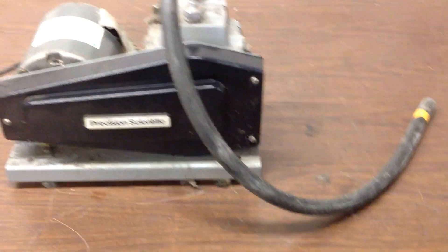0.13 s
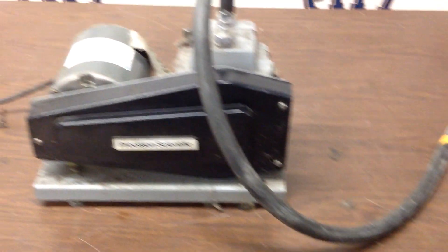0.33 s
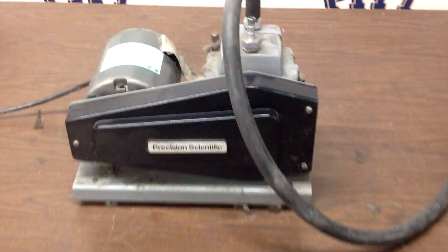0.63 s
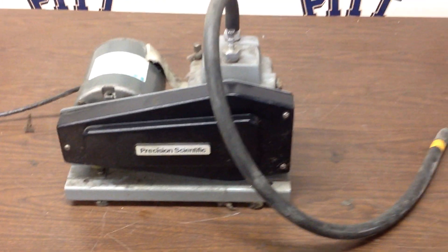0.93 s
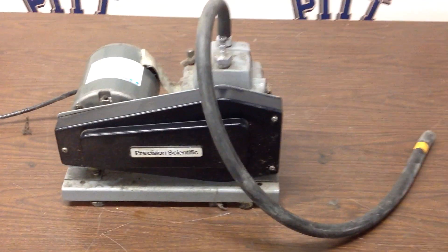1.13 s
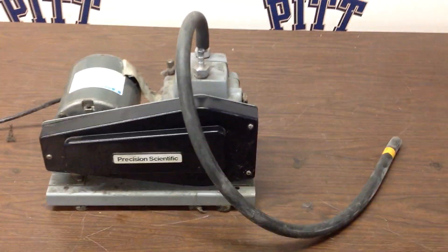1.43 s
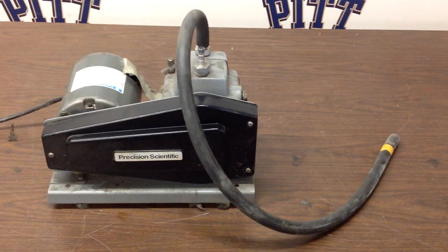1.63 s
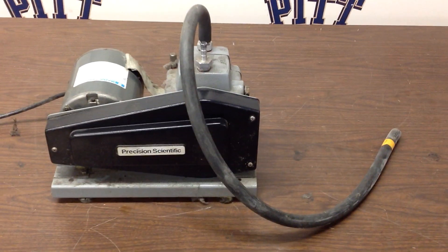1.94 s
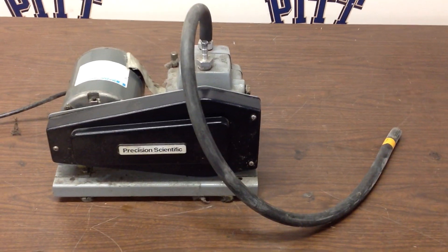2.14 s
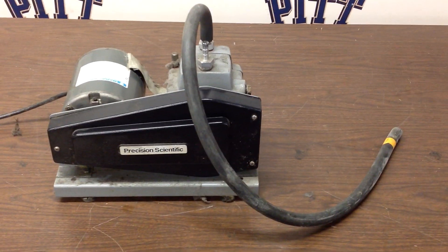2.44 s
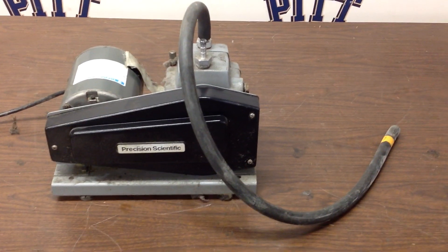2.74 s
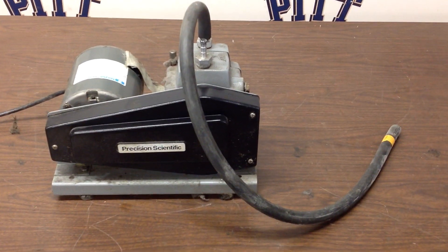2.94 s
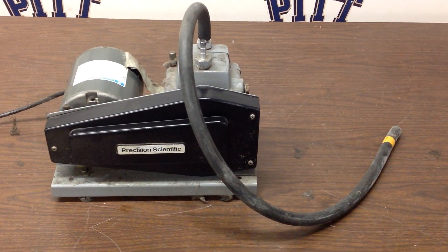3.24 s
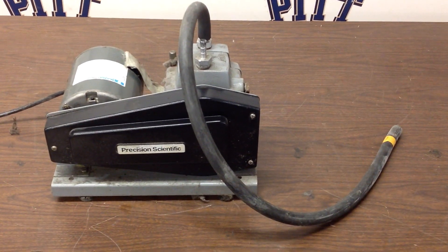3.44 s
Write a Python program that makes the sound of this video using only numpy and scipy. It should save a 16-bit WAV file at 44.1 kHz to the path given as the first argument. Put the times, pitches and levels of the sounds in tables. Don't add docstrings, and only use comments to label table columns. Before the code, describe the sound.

A vacuum pump already runs after a sliver of silence, its crisp metallic strokes rattling about twenty per second. Until 0.5 s it is very close and loud, with finger bumps and rustle around 0.1-0.2 s and harsh strokes near 0.36 s. It then settles lower and steady to 3.6 s: belt knocks every 0.3 s, lighter flaps, low hum, table vibration, pulsing airy hiss; handling tick near 0.92 s.

```python
import sys
import numpy as np
from scipy import signal
from scipy.fft import rfft, irfft, next_fast_len
from scipy.io import wavfile
from scipy.ndimage import uniform_filter1d

SR = 44100
rng = np.random.default_rng(int(sys.argv[2]) if len(sys.argv) > 2 else 0)


def amplitude_ratio(level_db):
    exponent = np.asarray(level_db, float) / 20
    return 10 ** exponent


def digitize_waveform(pressure):
    field = np.atleast_2d(pressure).T
    bounded = np.clip(field, -1, 1)
    quanta = np.round(bounded * 32767).astype(np.int16)
    wavfile.write(sys.argv[1], SR, quanta)


N = 157878
TIME_S = np.arange(N) / SR
STROKE_S, FIRST_STROKE_S, STROKE_DB = .048946, .0688, -19

# time_s, near_db
NEARNESS = [
    (0, 10.5),
    (.5, -1.5),
    (.75, 1.5),
    (1.0, 1.4),
    (2.0, 1.5),
    (3.58, 0.4),
]
# start_s, level_db
VANE_STROKES = [(0.1662, -13), (0.3619, -7), (0.462, -9.5), (0.5594, -10.5), (0.66, -13.5), (0.7566, -12),
                (0.8533, -16.5), (0.901, -16.5), (1.0482, -16), (1.147, -17.5), (1.195, -16),
                (1.342, -15.5), (1.39, -16), (1.6843, -16.5), (1.9786, -16.5), (2.0772, -16.5),
                (2.224, -14.5), (2.321, -14.5), (2.37, -14), (2.7118, -15.5), (2.761, -17), (2.8106, -16),
                (2.8594, -13.5), (2.9572, -18.5), (3.0546, -16.5), (3.103, -17), (3.299, -16.5),
                (3.398, -16), (3.4952, -16), (3.543, -16.5),
                (0.1181, -16), (0.214, -15), (0.2634, -15), (0.312, -15.5), (0.411, -15), (0.508, -17),
                 (0.607, -20), (0.7026, -23), (0.9484, -19.5), (1.292, -21), (1.4895, -17), (1.7325, -21.5),
                 (2.272, -21), (2.419, -13.5), (2.4668, -19.5), (2.517, -18.5), (2.663, -18.5),
                 (2.9068, -19), (3.005, -19), (3.2, -20)]
# pitch_hz, level_db, t60_s
HOUSING_MODES = [(2010, -20.5, 0.016), (2820, -21, 0.031), (4930, -35, 0.073), (5170, -21, 0.095),
                 (6240, -12.5, 0.06), (7470, -16, 0.022), (8450, -11, 0.0078), (8760, -10.5, 0.03),
                 (8556, -12.5, .03), (10160, -11, 0.089), (10910, -15.5, 0.039), (11230, -28, .03),
                 (14400, -22, 0.012)]
# frequency_hz, level_db
CRACK_COLOUR = [(1500, -13.5), (3500, -13), (5500, -7), (7000, -5.5), (9500, -2), (12000, -8.5),
                (15500, -15)]
# pitch_hz, level_db, t60_s
OIL_BOX_MODES = [(2217, -21, .1), (2090, -27, .025), (1075, -33, .05)]
# start_s, level_db
JOINT_KNOCKS = [(0.359, -23.5), (0.65, -22), (0.744, -32), (0.944, -21), (1.236, -22), (1.527, -23.5),
                (1.819, -22), (2.111, -23.5), (2.401, -21.5), (2.692, -26), (2.983, -26.5), (3.277, -26.5),
                (3.419, -27)]
# start_s, level_db
BELT_FLAPS = [(0.288, -46), (0.868, -30.5), (1.161, -47), (1.453, -30), (1.745, -30.5), (2.038, -33),
              (2.329, -28.5), (2.601, -30.5), (2.619, -38), (2.89, -30.5), (2.913, -29.5), (3.185, -28),
              (3.199, -35), (3.477, -28), (3.494, -34.5)]
# pitch_hz, level_db, t60_s
GUARD_MODES = [(252, -10, 0.092), (337.6, 0, 0.086), (433, 2, 0.12), (527, -14, 0.013), (637, -27, 0.033),
               (747, -3, 0.075), (925, -20, 0.014), (1190, -7, 0.025), (1290, -15, 0.053),
               (2110, -12.5, 0.024)]
# delay_s, level_db
GUARD_RATTLE = [
    (0, 1),
    (.0032, -12),
    (.0072, -10),
    (.016, -14),
]
# time_s, pitch_hz, level_db
MOTOR_HUM = [(.1, 120, -41), (.55, 119.5, -40), (.8, 119.8, -46), (1.2, 120, -47), (1.5, 120, -51.5),
             (2.4, 120, -49.5), (3.58, 120, -50)]
# pitch_hz, level_db, t60_s
TABLE_MODES = [(94, -13, 0.38), (155.2, -3.5, 0.21), (212.4, 2, 0.17), (271, 2.5, 0.22), (330.8, 0.5, 0.17),
               (367.4, -3, 0.21), (440, -3.5, 0.096), (596, -25, .05), (750.6, -12, 0.19),
               (1020, -8, 0.033)]
# centre_hz, width_hz, level_db
CASING_BANDS = [(497.5, 78, -48), (1077, 81, -46)]
# time_s, level_db
CASING_FADE = [(.2, -3), (.45, 0), (.7, -2), (1.3, -6), (1.6, -14)]
# centre_hz, width_hz, level_db
VALVE_BANDS = [(4790, 140, 5.5), (5370, 156, 9.5), (6070, 820, -1)]
# time_s, flow_db
VALVE_FLOW = [(0, 8), (.2, 5.5), (.4, 9.5), (.55, 7.5), (.8, -0.5), (1.5, -2), (3.58, -3.5)]
# frequency_hz, density_db_per_hz
AIR_COLOUR = [(18, -62), (30, -53), (106, -7), (221, -4.5), (1500, -18), (3870, -18.5), (8740, -15),
              (14800, -52), (16000, -44)]
# start_s, level_db, pitch_hz, length_cycles
FINGER_BUMPS = [(0.089, -16, 880, 0.53), (0.1, -18, 1220, 0.51), (0.1132, -15, 560, 1.2),
                (0.0976, -17.5, 1500, 0.82), (0.1028, -21, 1600, 1.9), (0.1259, -11, 1510, 0.94),
                (0.1267, -13, 1730, 0.81), (0.1271, -10, 1090, 0.79), (0.1305, -16.5, 322, 1.5),
                (.154, -7, 1260, 0.76), (0.1566, -20, 294, 2.4), (0.1643, -21, 261, 1.4),
                (0.1757, -23, 1500, 2), (0.18, -25.5, 1620, 3.5), (0.306, -21, 1020, 1.5),
                (0.7455, -26, 600, 1), (0.747, -20.5, 285, 2.2), (0.9238, -13.5, 730, 1.12),
                (0.929, -28, 646, 1.5)]


def level(x, db):
    return x * amplitude_ratio(db) / np.sqrt(np.mean(x ** 2))


def curve(rows, axis=1):
    rows = np.array(rows)
    return np.interp(TIME_S, rows[:, 0], rows[:, axis])


def noise():
    return rng.standard_normal(N)


def colour(x, points):
    p, n = np.array(points), next_fast_len(N)
    hz = np.maximum(np.arange(n // 2 + 1) * SR / n, 1)
    gain_db = np.interp(np.log(hz), np.log(p[:, 0]), p[:, 1])
    return irfft(rfft(x, n) * amplitude_ratio(gain_db), n)[:N]


def ring(x, hz, t60_s):
    r = np.exp(-np.log(1000) / (max(t60_s, .002) * SR))
    w = 2 * np.pi * hz / SR
    return signal.lfilter([np.sin(w)], [1, -2 * r * np.cos(w), r * r], x)


def walk(rate_hz):
    k = int(SR / rate_hz)
    held = np.repeat(rng.standard_normal(N // k + 1), k)
    smooth = uniform_filter1d(uniform_filter1d(held, k), k)[:N]
    return smooth / smooth.std()


def strikes(times, db, fade_s, rise_s=1e-4):
    x = np.zeros(N + SR)
    x[(np.asarray(times) * SR).astype(int)] = amplitude_ratio(db)
    fading = signal.lfilter([1], [1, -np.exp(-1 / (fade_s * SR))], x)
    r = np.exp(-1 / (rise_s * SR))
    return signal.lfilter([1 - r], [1, -r], fading)[:N]


def struck(times, db, modes, fade_s, scatter_db):
    out, chance = 0, rng.standard_normal((len(times), len(modes)))
    for k, (hz, mode_db, t60_s) in enumerate(modes):
        push = strikes(times, db + mode_db + scatter_db * chance[:, k], fade_s) * noise()
        out = out + ring(push, hz, t60_s) / np.sqrt(fade_s * SR / 2)
    return out


def stroke_swing(peak_at):
    phase = (TIME_S - FIRST_STROKE_S) / STROKE_S
    return np.cos(2 * np.pi * (phase - peak_at))


def vanes():
    times = np.arange(FIRST_STROKE_S, N / SR, STROKE_S)
    chance = rng.standard_normal((len(times), 3))
    db = STROKE_DB + 1.5 * chance[:, 0] + np.interp(times, *np.array(NEARNESS).T)
    special = np.array(VANE_STROKES)
    k = np.round((special[:, 0] - FIRST_STROKE_S) / STROKE_S).astype(int)
    times[k], db[k] = special[:, 0], special[:, 1]
    box = oil_box(times, STROKE_DB + .65 * (db - STROKE_DB))
    times = np.r_[times, times + .005 * np.exp(.15 * chance[:, 1])]
    db = np.r_[db, db - 8 + 1.5 * chance[:, 2]]
    modes = [(hz, g_db, t60_s if hz < 2500 else min(t60_s, .016)) for hz, g_db, t60_s in HOUSING_MODES]
    housing = struck(times, db, modes, fade_s=.0025, scatter_db=1.8)
    crack = level(colour(noise(), CRACK_COLOUR), -9) * strikes(times, db, fade_s=.0045, rise_s=.0004)
    chatter_db = .22 * 8.5 * walk(500)
    return box + (housing + crack) * amplitude_ratio(chatter_db)


def oil_box(times, db):
    swell_s, detune, scatter_db = .005, .006, 1.5
    out = np.zeros(N + SR)
    u = np.arange(SR // 10) / SR
    swell = 1 - np.exp(-(u / swell_s) ** 2)
    for start_s, stroke_db in zip(times, db):
        i = int(start_s * SR)
        for hz, mode_db, t60_s in OIL_BOX_MODES:
            a, b = rng.standard_normal(2)
            shape = swell * amplitude_ratio(stroke_db + mode_db + scatter_db * a - 60 * u / t60_s)
            out[i:i + len(u)] += shape * np.sin(2 * np.pi * hz * (1 + detune * b) * u + 10 * a)
    return out[:N]


def belt():
    return guard(JOINT_KNOCKS, gain_db=-5.5, tilt_db_oct=0) + guard(BELT_FLAPS, gain_db=-2.5, tilt_db_oct=7.5)


def guard(blows, gain_db, tilt_db_oct):
    t, db = np.array(blows).T
    chance = rng.standard_normal((len(t), len(GUARD_MODES)))
    late = np.exp(.148 * rng.standard_normal((len(t), len(GUARD_RATTLE))))
    ringing = 0
    for k, (hz, mode_db, t60_s) in enumerate(GUARD_MODES):
        push = np.zeros(N + SR)
        size = amplitude_ratio(db + gain_db + mode_db + tilt_db_oct * np.log2(hz / 755) + chance[:, k])
        for j, (after_s, rattle_db) in enumerate(GUARD_RATTLE):
            push[((t + after_s * late[:, j]) * SR).astype(int)] += size * amplitude_ratio(rattle_db)
        ringing = ringing + ring(push[:N], hz, min(t60_s, .075))
    soft = np.exp(-1 / (.00019 * SR))
    ringing = signal.lfilter([1 - soft], [1, -soft], ringing)
    slap = level(ring(noise(), 2080, .001), -13) * strikes(t, db, .02, rise_s=.003)
    squeak = level(ring(noise(), 5630, .0041), .5) * strikes(t - .0014, db, .0035, rise_s=.0017)
    body = level(ring(noise(), 780, .0024), -12.5) * strikes(t, db, .018, rise_s=.0035)
    return ringing + slap + squeak + body


def motor():
    wobble_db = 2 * np.clip(TIME_S, .7, 1.8) * walk(25.02)
    hum = np.sin(2 * np.pi * np.cumsum(curve(MOTOR_HUM)) / SR)
    hum = np.sqrt(2) * amplitude_ratio(curve(MOTOR_HUM, axis=2) + wobble_db) * hum
    jolts = np.cumsum(np.exp(.2 * rng.standard_normal(400)) / 68)
    jolts = jolts[jolts < N / SR]
    shake = struck(jolts, 0, TABLE_MODES, fade_s=.0036, scatter_db=2.3)
    return hum + level(shake, -39) * amplitude_ratio(.49 * curve(NEARNESS))


def casing_buzz():
    out = 0
    for hz, width_hz, db in CASING_BANDS:
        t60_s = 1.6 / width_hz
        out = out + level(ring(ring(noise(), hz, t60_s), hz, t60_s), db)
    return out * amplitude_ratio(curve(CASING_FADE) + 2 * stroke_swing(.29))


def air():
    puff_db = 3 * stroke_swing(1)
    flow_db = curve(VALVE_FLOW)
    valve = 0
    for hz, width_hz, db in VALVE_BANDS:
        band = level(ring(noise(), hz, .95 / width_hz), db)
        valve = valve + band * amplitude_ratio(2 * walk(40))
    valve = signal.sosfilt(signal.butter(4, 4430, "high", fs=SR, output="sos"), valve)
    valve = level(valve * amplitude_ratio(puff_db), -39) * amplitude_ratio(flow_db)
    broad = level(colour(noise(), AIR_COLOUR), -42) * amplitude_ratio(1.2 * walk(150) + curve(NEARNESS))
    fizz = level(colour(noise(), [(6000, -25), (11000, 13), (15500, -6)]), -50)
    return valve + broad + fizz * amplitude_ratio(.9 * flow_db + .48 * puff_db)


def fingers():
    after_s = np.maximum(TIME_S - .108, 0)
    rustle = level(ring(noise(), 1560, .0015) * amplitude_ratio(6 * walk(300)), -34)
    grip = level(ring(noise(), 45, .05), -32)
    out = rustle * np.exp(-after_s / .03) + grip * np.exp(-after_s / .065)
    for start_s, db, hz, cycles in FINGER_BUMPS:
        u = (TIME_S - start_s) * hz
        out = out - amplitude_ratio(db) * np.exp(-(2 * u / max(cycles, 1)) ** 2) * np.cos(2 * np.pi * u - .6)
    return out


def scene():
    near = vanes() + belt()
    t = np.arange(SR // 3) / SR
    tail = rng.standard_normal(len(t)) * amplitude_ratio(-60 * t / .094) * (t > .003)
    room = signal.fftconvolve(near, tail / np.sqrt(np.sum(tail ** 2)))[:N]
    pump = near + amplitude_ratio(-9.5) * room + air()
    low = signal.sosfiltfilt(signal.butter(2, 12400, fs=SR, output="sos"), pump)
    pump = low + (pump - low) * amplitude_ratio(.1 * curve(NEARNESS))
    return (pump + motor() + casing_buzz() + fingers())[None]


def band_limit(x):
    return signal.sosfilt(signal.butter(12, 16480, fs=SR, output="sos"), x)


def record(dry):
    opened = dry * (np.arange(N) > .0842 * SR)
    x = signal.sosfilt(signal.butter(3, 89.6, "high", fs=SR, output="sos"), opened)
    x = signal.sosfilt(signal.ellip(10, .2, 50, 15400, fs=SR, output="sos"), x)
    return band_limit(x)


dry = scene()
out = record(dry)
digitize_waveform(out)
```